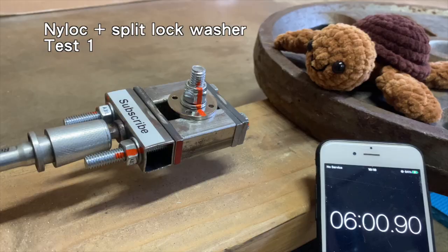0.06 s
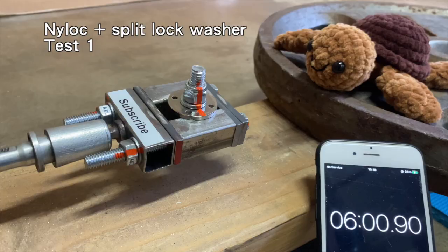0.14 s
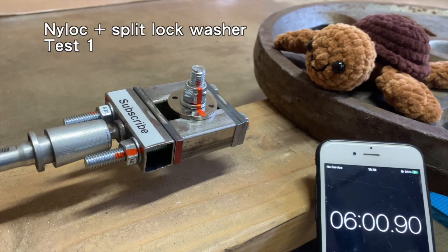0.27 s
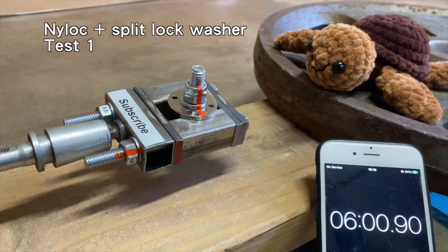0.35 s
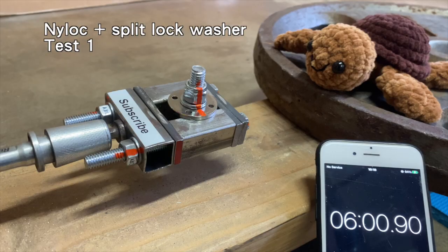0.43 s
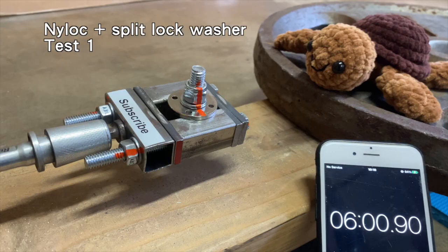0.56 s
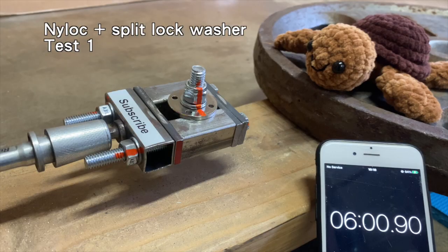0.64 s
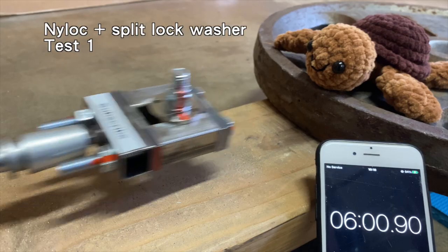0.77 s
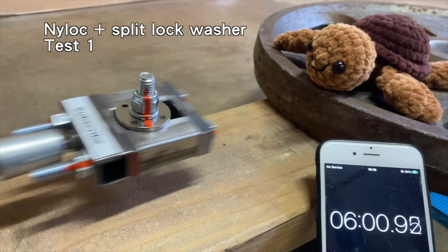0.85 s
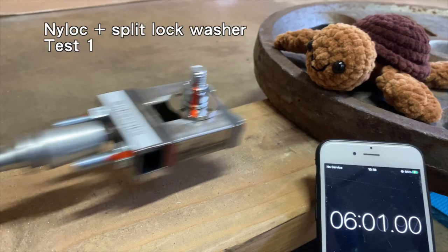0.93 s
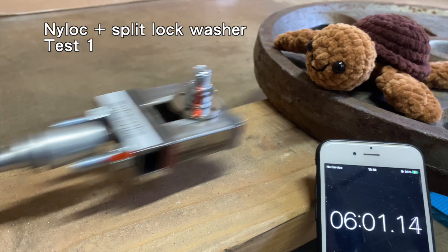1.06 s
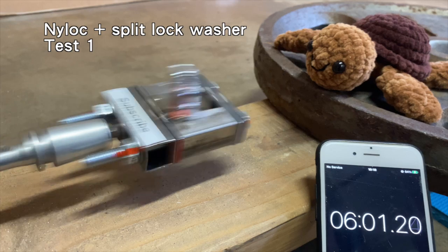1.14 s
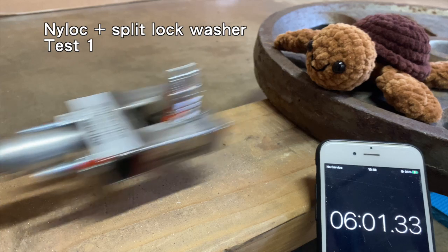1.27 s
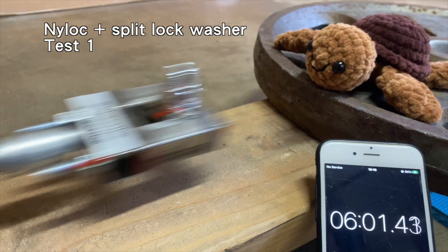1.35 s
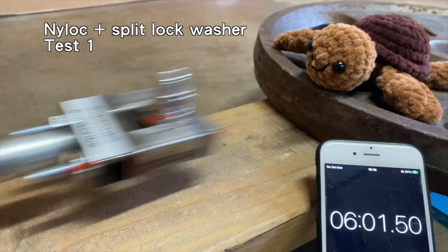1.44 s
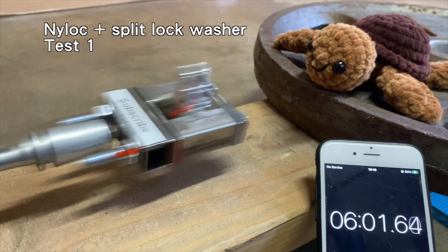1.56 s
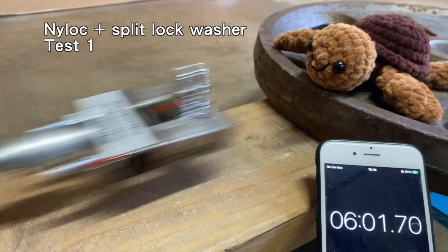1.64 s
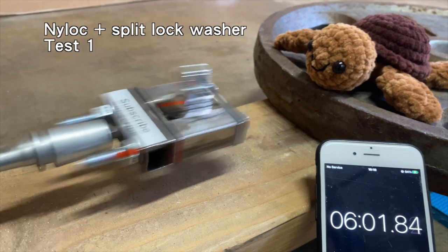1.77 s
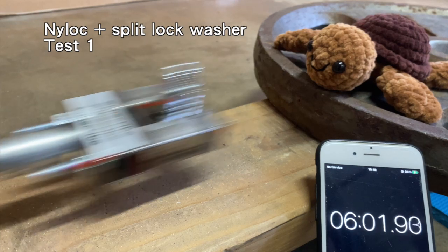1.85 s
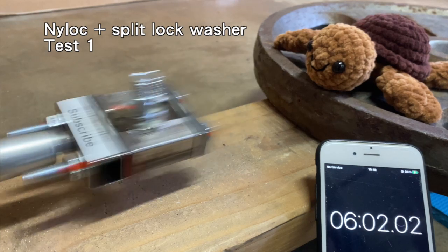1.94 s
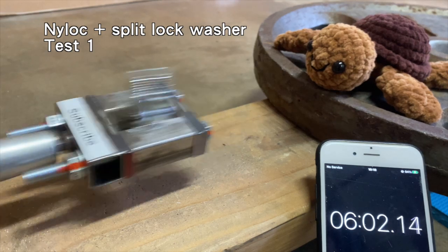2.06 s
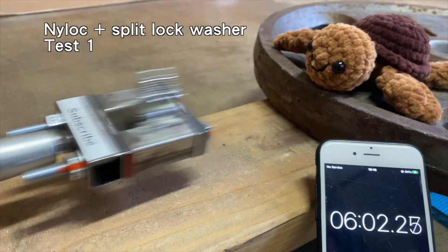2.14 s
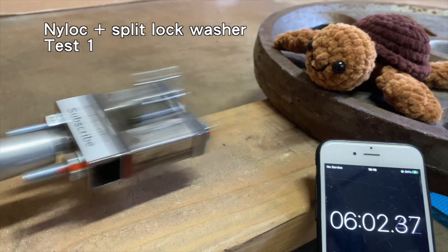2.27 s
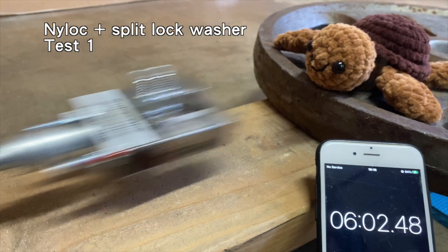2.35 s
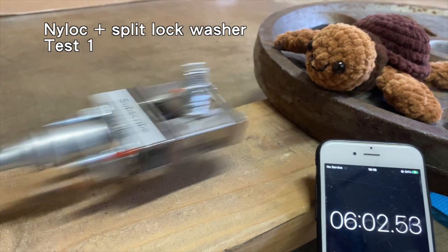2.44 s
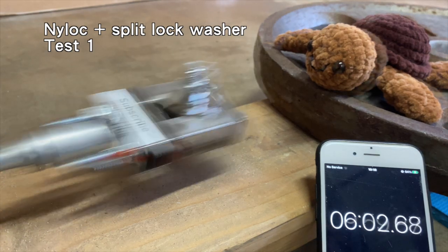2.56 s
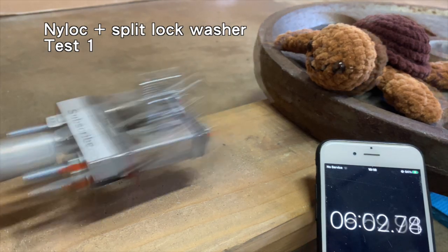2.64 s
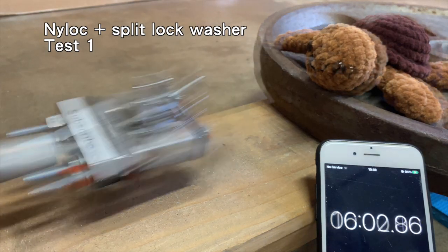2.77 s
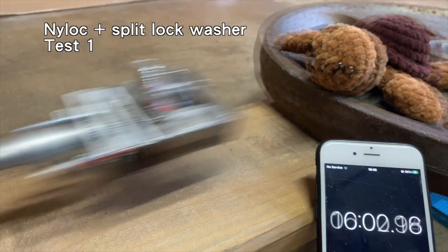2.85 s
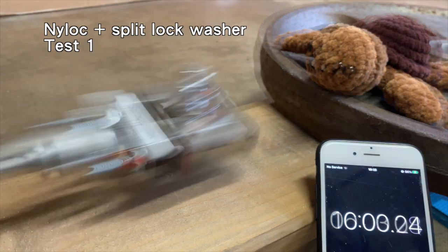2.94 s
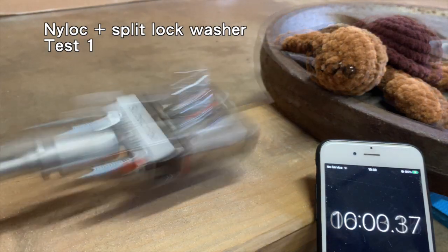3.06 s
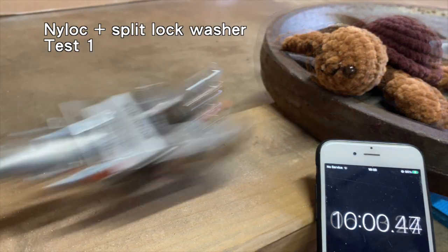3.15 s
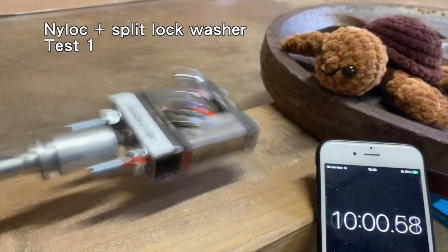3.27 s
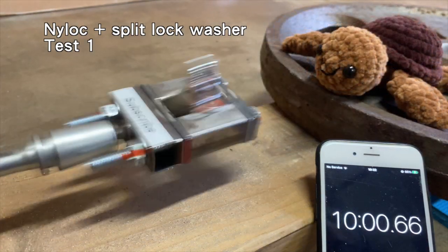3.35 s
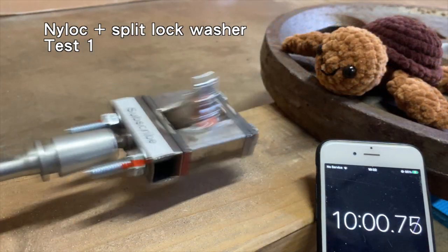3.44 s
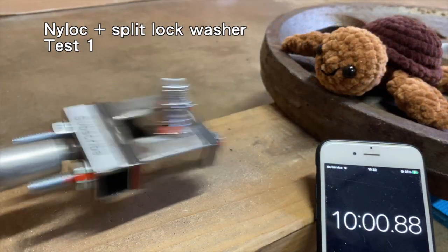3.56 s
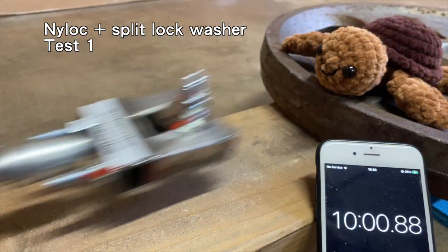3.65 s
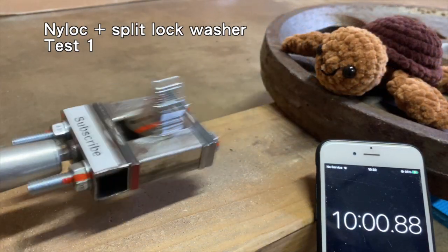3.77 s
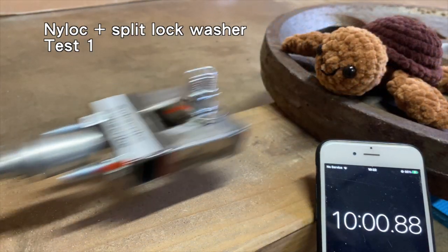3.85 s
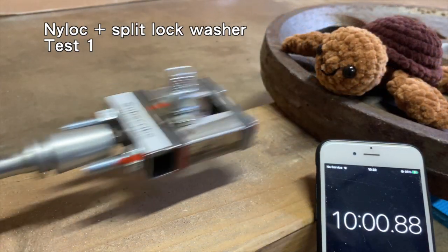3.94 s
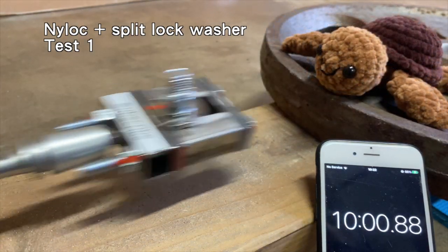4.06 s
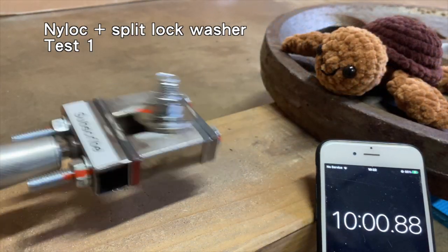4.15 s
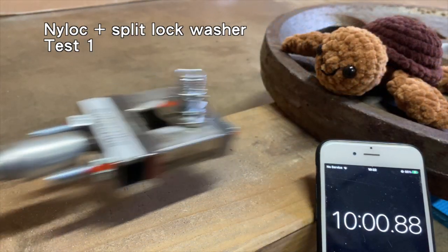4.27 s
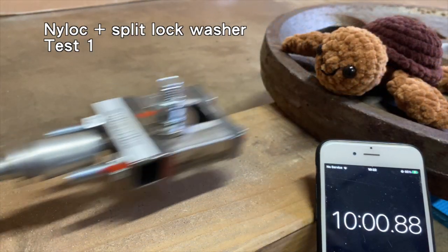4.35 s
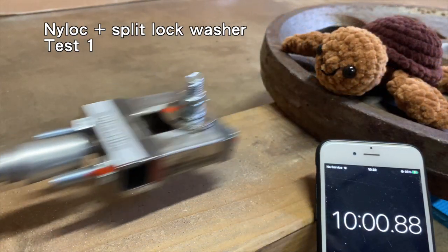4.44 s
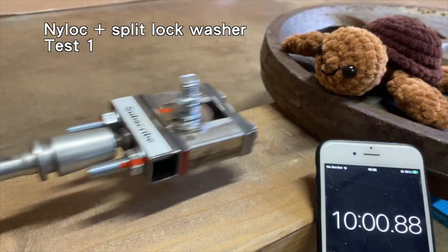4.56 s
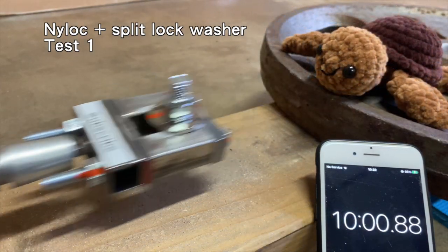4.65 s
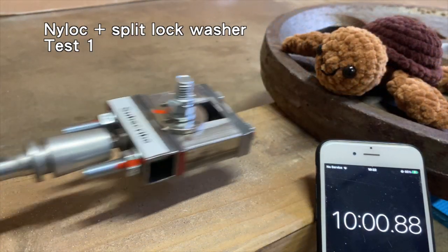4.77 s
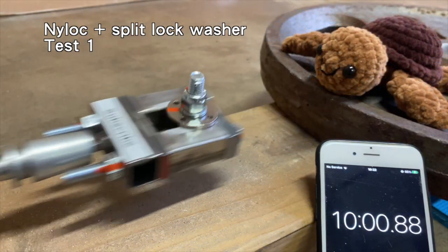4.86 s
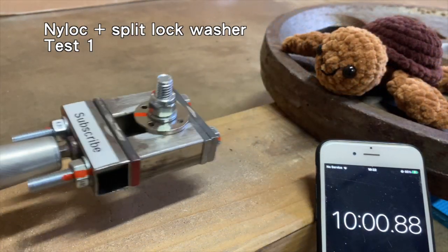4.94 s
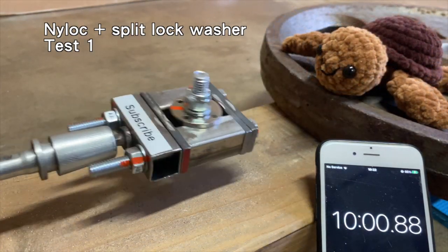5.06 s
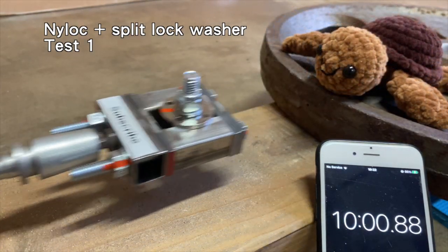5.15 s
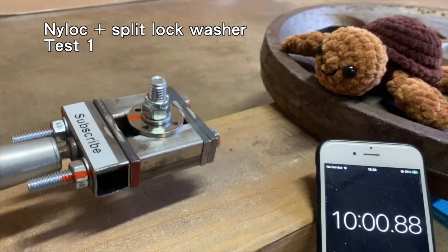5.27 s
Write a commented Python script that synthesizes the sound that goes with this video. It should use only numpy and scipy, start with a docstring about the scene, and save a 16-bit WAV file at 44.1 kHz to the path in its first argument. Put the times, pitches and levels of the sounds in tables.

```python
"""Reciprocating saw shaking a steel jig

A reciprocating saw starts, shakes a steel jig on a wooden bench and coasts to a stop, over shop rumble and hum.
A loose slide hits the jig frame at each end of the stroke: clicks ring tuned modes under bursts of noise.
Gears grind and loose parts chatter as random ticks through the same modes; bench jolts are falling sines.
A phone hears it through two microphone ports, with different delays and levels and a short room echo."""
import sys
import numpy as np
from scipy import signal
from scipy.fft import rfft, irfft, next_fast_len
from scipy.io import wavfile
from scipy.ndimage import uniform_filter1d

SR = 44100
rng = np.random.default_rng(int(sys.argv[2]) if len(sys.argv) > 2 else 0)


def unload_wav(signal):
    """Save mono or channel-first audio to the path in sys.argv[1] as 16-bit WAV at rate SR, clipped to [-1, 1]."""
    wavfile.write(
        sys.argv[1],
        SR,
        np.round(np.clip(np.atleast_2d(signal).T, -1, 1) * 32767).astype(np.int16),
    )


def how_loud(loudness_db):
    """Turn decibels into a plain amplitude multiplier (0 dB gives 1, 20 dB gives 10)."""
    steps = np.asarray(loudness_db, float) / 20
    return 10 ** steps


N = 233849


def evened(x):
    """Scales to rms 1."""
    return x / np.sqrt(np.mean(x ** 2) + 1e-20)


def read(points, hz):
    """Reads a spectrum on a log-frequency axis."""
    f, value = np.transpose(points)
    return np.interp(np.log(hz + 1), np.log(f + 1), value)


def curve(rows, column):
    """One column of a time table at every sample: -140 before the first row, held after the last."""
    rows = np.array(rows)
    return np.interp(np.arange(N) / SR, rows[:, 0], rows[:, column], -140, rows[-1, column])


def coloured(x, spectrum):
    """Filters by a dB spectrum."""
    size = next_fast_len(N)
    gain = how_loud(read(spectrum, np.fft.rfftfreq(size, 1 / SR)))
    return irfft(rfft(x, size) * gain, size)[..., :N]


def coloured_noise(spectrum):
    """White noise filtered by a dB spectrum."""
    return coloured(rng.standard_normal(N), spectrum)


def ring(clicks, hz, t60):
    """A mode: each click starts a dying sine."""
    radius = np.exp(-np.log(1000) / (t60 * SR))
    w = 2 * np.pi * hz / SR
    return signal.lfilter([0, np.sin(w)], [1, -2 * radius * np.cos(w), radius * radius], clicks)


def ticks(per_s, spread_db):
    """Random clicks of random sign, a few of them large."""
    out = (rng.random(N) < per_s / SR) * 1.
    at = np.flatnonzero(out)
    size, sign = rng.random((len(at), 2)).T
    out[at] = how_loud(-spread_db * np.log(size + .005)) * np.sign(sign - .5)
    return out


# low rumble of the shop and drone of the bench: (t/s, rumble level/dB, drone level/dB)
RUMBLE_LEVELS = [(0, -68, -72.5), (.6, -68, -74.5), (.64, -66, -59), (.675, -65, -61), (.8, -73, -68.5),
                 (.85, -67, -60.5), (1.1, -73.5, -66), (1.7, -69.5, -67), (2, -71, -64), (2.1, -82, -66.5),
                 (2.85, -88, -75), (3.05, -91, -72.5), (3.7, -103, -85), (4.3, -106, -81.5),
                 (5.3, -91.5, -92)]
# colour of the rumble: (f/Hz, level/dB)
RUMBLE_TONE = [(20, -31.5), (40, 14.5), (70, 13.5), (110, 18.5), (200, -71.5)]
# colour of the bench drone: (f/Hz, level/dB)
DRONE_TONE = [(60, -39.5), (130, 6), (220, 8), (320, -0.5), (500, -10), (900, -31.5)]


def rumble_and_drone():
    """Two bands of low noise: the shop's rumble and the bench's drone."""
    rumble = how_loud(curve(RUMBLE_LEVELS, 1)) * evened(coloured_noise(RUMBLE_TONE))
    drone = how_loud(curve(RUMBLE_LEVELS, 2)) * evened(coloured_noise(DRONE_TONE))
    return rumble + drone


# colour of the quiet shop air: (f/Hz, level/dB)
AIR_TONE = [(300, -22), (620, 11.5), (1500, 1), (2000, -3.5), (2400, -5.5), (2770, -10), (3100, -0.5),
            (3500, -10), (4000, -19.5), (6000, -42)]
# loudness of the shop air: (t/s, level/dB)
AIR_LEVELS = [(0, -77), (.6, -79), (4.8, -85.5), (5.3, -92.5)]


def shop_air():
    """The quiet air of the room as soft midrange noise."""
    return how_loud(curve(AIR_LEVELS, 1)) * evened(coloured_noise(AIR_TONE))


# colour of the faint hiss: (f/Hz, level/dB)
HISS_TONE = [(1500, 0.5), (3000, -4), (5000, -4.5), (8000, -7.5), (12000, -11), (13500, -31), (14500, -50)]


def hiss():
    """Faint treble noise: it drops early to a fainter floor, puffs once and fades, and ends at 0.62 s."""
    puff_s, rise_s, fall_db_per_s = 0.19, 0.027, 118
    t = np.arange(N) / SR
    rise = np.clip((t - puff_s) / rise_s, 0, 1)
    puff = rise * how_loud(-74 - fall_db_per_s * np.maximum(t - puff_s - rise_s, 0))
    opening = how_loud(-85) * (t < 0.06)
    floor = how_loud(-95) * (t < 0.62)
    return (opening + puff + floor) * evened(coloured_noise(HISS_TONE))


def whistle():
    """A faint fuzzy tone, noise through one narrow mode, that fades at the start."""
    hz, level_db, end_s = 1860, -77, 0.13
    fade = np.clip(1 - np.arange(N) / SR / end_s, 0, 1)
    return how_loud(level_db) * fade * evened(ring(rng.standard_normal(N), hz, 0.02))


# mains hum, louder while the motor strains to start: (t/s, fundamental level/dB, octave level/dB)
HUM_LEVELS = [(0, -84, -102), (.1, -66, -91), (.18, -63.5, -74), (.26, -67, -101), (.3, -63, -104),
              (.4, -72, -94), (.62, -67.5, -85), (.64, -54, -63.5), (.67, -62.5, -72), (.71, -58.5, -58.5),
              (.75, -58, -64), (.8, -58.5, -68.5), (.85, -62, -91.5), (1.06, -66.5, -75.5),
              (1.1, -66, -101)]


def hum():
    """About twice the mains frequency and its harmonics, over a faint far hum of noise through a narrow mode."""
    near_hz, third_db = 122.4, -6  # third harmonic against the octave
    far_hz, far_db = 120, -91
    turn = 2 * np.pi * near_hz * np.arange(N) / SR
    sounding = np.arange(N) / SR < HUM_LEVELS[-1][0]
    upper = np.sin(2 * turn) + how_loud(third_db) * np.sin(3 * turn)
    near = how_loud(curve(HUM_LEVELS, 1)) * np.sin(turn) + how_loud(curve(HUM_LEVELS, 2)) * upper
    far = evened(ring(rng.standard_normal(N), far_hz, 0.23))
    return np.sqrt(2) * near * sounding + how_loud(far_db) * far


# the slide strikes the frame at each end of its stroke: (t/s, housing level/dB,
# then steel level/dB under 5.6 kHz, 5.6-7 kHz, 7-9 kHz and above 9 kHz), before each strike's own variation
BLOWS = [(0.8640, -27, -21.5, -24, -33.5, -24.5), (0.9332, -32, -24.5, -20, -21.5, -31.5),
         (0.9997, -27.5, -24, -26, -27, -26.5), (1.0523, -32.5, -24.5, -26, -30, -32),
         (1.1054, -28.5, -24.5, -20, -27.5, -24.5), (1.1537, -54, -26.5, -23, -30, -28),
         (1.2022, -32.5, -28.5, -20, -34, -25.5), (1.2433, -37.5, -32, -30, -37, -32),
         (1.2892, -31, -35.5, -32, -37, -26), (1.3269, -28, -24, -25.5, -25, -30.5),
         (1.367, -34.5, -31.5, -26, -31.5, -28.5), (1.405, -60, -38, -40, -31.5, -34.5),
         (1.4436, -32, -34, -29.5, -31, -27.5), (1.4843, -38, -32, -34, -42.0, -38),
         (1.515, -33, -30.5, -28, -34.5, -25), (1.5531, -46, -37, -40, -29.5, -31.5),
         (1.5876, -34.5, -30.5, -26, -29.5, -27), (1.624, -40, -33, -31.5, -34, -34),
         (1.6596, -34.5, -32.5, -29, -34, -31.5), (1.6934, -35, -35, -38, -36.5, -32),
         (1.7235, -36, -36, -37.5, -29, -29.5), (1.7594, -42, -37.5, -38, -37, -33.0),
         (1.7917, -38, -33.5, -31, -30, -32.5), (1.8242, -42, -34, -54, -30.5, -32),
         (1.856, -37.5, -36, -34, -31, -29), (1.8919, -44, -35, -35, -40, -36),
         (1.9236, -35.5, -38, -29, -30, -30.5), (1.956, -41, -30.5, -28.5, -38, -34),
         (1.991, -39.0, -37, -28, -36, -34), (2.0185, -41.5, -37, -40, -42, -32.5),
         (2.0519, -35, -37, -32, -38, -37.5), (2.0831, -42, -34, -38, -42, -35.5),
         (2.1139, -32, -33, -33, -34, -28.5), (2.147, -60, -36, -40, -47, -39),
         (2.1776, -36.5, -34.5, -28.5, -32, -29), (2.2099, -39.5, -33, -31, -43, -35.5),
         (2.2392, -36, -38.5, -29.5, -41, -33.5), (2.271, -36.5, -31.5, -31, -40, -30.5),
         (2.3005, -36.5, -34, -25.5, -38.5, -30), (2.334, -46, -31, -33, -48, -38),
         (2.3659, -33.5, -31, -31, -45, -33), (2.394, -36, -39, -32.5, -46, -32),
         (2.425, -33.5, -34, -38, -34.5, -24.5), (2.4581, -39, -39, -37, -45, -37),
         (2.4883, -34.5, -34.5, -33, -33, -28), (2.519, -46, -38, -36, -53, -38.0),
         (2.547, -32, -38.5, -28.5, -43, -27.5), (2.58, -60, -38, -43, -50, -40),
         (2.6097, -40, -39, -31, -36, -35), (2.6415, -35.5, -34, -38, -38, -38),
         (2.6736, -37, -38.5, -33, -44, -30), (2.703, -57, -47, -35, -45, -44),
         (2.7336, -39.5, -42, -36.5, -39, -33), (2.7636, -41, -51, -35, -43, -38.5),
         (2.794, -42, -48, -33, -45, -26.5), (2.827, -51, -53, -35, -49, -37.5),
         (2.8552, -43, -55, -56, -55, -34), (2.886, -57, -58, -61, -59, -43),
         (2.918, -43.5, -48, -35, -45, -30.5), (2.9641, -43, -39, -39, -47.5, -38),
         (2.9983, -49, -44.0, -41, -42.5, -39), (3.0314, -66, -43.5, -46, -36, -40),
         (3.0595, -39.5, -40, -37, -38, -32.5), (3.0923, -50, -36, -43, -39, -39),
         (3.123, -58, -40, -45.0, -52, -32.5), (3.1557, -40, -44, -46, -41.0, -37),
         (3.186, -38, -37.5, -30.5, -34, -34.5), (3.225, -41, -43, -37, -44, -37.5),
         (3.2614, -41.5, -38, -41, -38, -35.5), (3.3008, -43.5, -59, -53, -46, -42),
         (3.336, -45, -43, -39, -43, -33), (3.3748, -42, -40, -42, -43, -35.5),
         (3.4151, -40, -42, -33, -46.5, -35.5), (3.459, -48, -43, -42, -49, -43),
         (3.4995, -38.5, -40, -33, -41, -34), (3.5453, -52.5, -48, -45.5, -42, -44.5),
         (3.5944, -49, -41, -36, -41, -40.5), (3.6404, -54, -41, -41, -40, -41),
         (3.6952, -42, -40, -32, -36.5, -36.5), (3.7429, -43.5, -43, -41, -40, -36.5),
         (3.8, -43.5, -41.5, -40.5, -42, -41.5), (3.856, -47.5, -44, -40.5, -43.5, -45),
         (3.917, -42.5, -42.5, -43, -42, -41), (3.972, -44, -45, -50, -40.5, -45),
         (4.043, -42.5, -46, -38, -37, -40.5), (4.1042, -41, -43, -42, -40.5, -43),
         (4.1813, -42.5, -40, -36.5, -35, -41), (4.2648, -52, -50, -46, -44, -46),
         (4.3293, -43.5, -41.5, -42, -36, -41), (4.4185, -50.0, -43, -46, -46, -45.5),
         (4.5221, -50, -47, -40, -35.5, -44.5), (4.618, -63, -48, -49.5, -47.5, -58),
         (4.734, -55, -54, -48.5, -38.5, -48.5), (4.8615, -65, -55, -61, -58.5, -62.5)]
# play in the crank knocks the housing as it takes up and lets go:
# (t/s, housing level/dB under 2 kHz, housing level/dB over 2 kHz, steel level/dB, change/dB at each rebound)
KNOCKS = [(0.619, -54, -62, -54, -1.5), (0.622, -41, -43.5, -49, -14), (0.6347, -34.5, -45, -53.5, -4),
          (0.6467, -43, -52, -57, -10), (0.6553, -39.5, -52, -53, -3.5), (0.695, -34, -39, -55, -2.5),
          (0.708, -41, -54, -52.5, -2), (0.728, -36, -47, -57, -13), (0.77, -41, -58, -67, -1),
          (0.81, -38, -44, -55, 0), (0.823, -40, -45, -58, -10), (0.8289, -29, -38, -52, -8),
          (0.8377, -29.5, -41, -49, -14), (0.893, -31, -42, -62, -6), (0.9638, -32, -40, -62, -21),
          (1.047, -32, -47, -64, -5), (1.0782, -36, -39, -62, -14), (1.129, -49, -50, -68, -14),
          (1.18, -48, -36, -62, -10), (1.638, -35, -41, -62, -7), (3.667, -52, -59, -70, -8),
          (3.717, -47, -46, -67, -8), (3.769, -56, -49, -59, -2.5), (3.943, -47, -60, -73, -14),
          (4.005, -50, -60, -64, -7), (4.0268, -54, -64, -78, -8), (4.064, -52, -62, -56, -9),
          (4.162, -55, -55, -70, -1), (4.17, -59, -44, -60, -15), (4.236, -54, -56, -75, -2),
          (4.283, -60, -58, -72, -12), (4.2905, -50, -57, -63, -0.5), (4.3178, -56, -50, -80, -8),
          (4.393, -53, -61, -84, -8), (4.431, -70, -65, -57, -1), (4.4884, -50, -69, -74, -2),
          (4.531, -56, -51, -77, -15), (4.538, -65, -57, -77, -14), (4.548, -63, -69, -75, -20),
          (4.585, -57, -65, -78, -2), (4.646, -67, -64, -65, -12), (4.663, -54, -59, -76, -7),
          (4.69, -54, -76, -75, -1), (4.808, -45, -50, -64, -14), (4.917, -66, -72, -78, -3),
          (4.934, -50.5, -57, -66, -10), (5.0638, -63, -68.5, -77, -8), (5.067, -54, -64, -71.5, -2),
          (5.0736, -59, -67, -78, -13), (5.0892, -47.5, -53.5, -67, -4.5), (5.282, -50.5, -53.5, -67, -29)]
# a blow is four contacts in quick succession: level/dB of each in the steel
STEEL_CONTACTS = [-3.5, -2, -8, -15]
# level/dB of each contact in the housing, which takes the force later
HOUSING_CONTACTS = [-11, -4.5, -7.5, -11.5]


def strikes():
    """Blows, then knocks: times in s, dB reaching six frequency groups, dB of contacts in housing and steel."""
    knock_s, low_db, high_db, steel_db, rebound_db = np.transpose(KNOCKS)
    blow_s, *blows_db = np.transpose(BLOWS)
    # a knock jars the low rings of the steel most
    knocks_db = [low_db, high_db, steel_db + 7, steel_db + 4, steel_db, steel_db]
    reach_db = np.c_[blows_db[:1] + blows_db, knocks_db]
    contacts_db = [np.r_[np.tile(db, (len(blow_s), 1)), rebound_db[:, None] * np.arange(4)]
                   for db in (HOUSING_CONTACTS, STEEL_CONTACTS)]
    return np.r_[blow_s, knock_s], reach_db, contacts_db


GROUP_EDGES = [2000, 3200, 5600, 7000, 9000]  # Hz that part the six groups: two of housing, four of steel
# modes of the steel jig: (f/Hz, level/dB, t60/s)
JIG = [(3635, -6, .038), (3765, -6.5, .033), (4005, -7.5, .036), (4350, -10, .028), (4815, -5, .03),
       (5230, -14, .025), (5560, -15, .02), (6140, -5, .036), (6260, -9, .025), (6570, -8, .032),
       (7480, -2, .025), (7560, -6, .05), (8480, -8, .05), (9860, -6, .055), (10690, -9, .04),
       (10870, -1.5, .055), (11480, -8, .045), (12000, -8, .025), (12400, -7, .025), (13600, -14, .025),
       (14750, -11, .03), (15500, -12, .025)]
# resonances of the saw housing: (f/Hz, level/dB, t60/s as struck by the slide)
HOUSING = [(632, -10.5, 0.057), (839, -8, 0.018), (1060, -16, 0.014), (1168, -7.5, 0.013),
           (1264, -8.5, 0.013), (1410, -2.5, 0.0047), (1658, 3.5, 0.013), (1880, -5, 0.0055),
           (2180, -6, 0.014), (2380, -6.5, 0.0042), (2554, -4.5, 0.017), (2656, -3, 0.024),
           (2804, -2.5, 0.015)]


def struck_modes(at, reach_db, contacts_db, knock):
    """Each contact rings jig and housing; no two strikes land on the same spot, so mode levels vary."""
    ring_db, spread_db = -11.0, 3.5
    jig_detune, housing_detune = .006, .012  # share of the mode's frequency
    knock_damped = 0.51  # the crank stays pressed on the housing: shorter rings
    seat = np.digitize(rng.standard_normal(len(at)), [-.43, .43]) - 1  # how the slide sits shifts the tuning
    push = np.sign(rng.standard_normal(at.shape))  # the housing is pushed as one piece
    out = np.zeros(N)
    for k, (hz, db, t60) in enumerate(JIG + HOUSING):
        in_jig = k < len(JIG)
        spot = rng.standard_normal(at.shape)
        level_db = reach_db[np.digitize(hz, GROUP_EDGES), :, None] + contacts_db[in_jig] + db + ring_db
        size = how_loud(level_db + spread_db * spot / (1 + knock[:, None]))
        size = size * (np.sign(spot) if in_jig else push)
        held = knock & (not in_jig)
        clicks = np.zeros(N)
        np.add.at(clicks, at[held], size[held])
        out += ring(clicks, hz, knock_damped * t60)
        detune = jig_detune if in_jig else housing_detune
        for way in (-1, 0, 1):
            clicks = np.zeros(N)
            free = (seat == way) & ~held
            np.add.at(clicks, at[free], size[free])
            out += ring(clicks, hz * (1 + detune * way * (-1) ** k), t60)
    return out


# broad crack of steel on steel: (f/Hz, level/dB)
CRACK = [(300, -63), (1000, 0.5), (2500, -3.5), (5500, -11), (7500, 1), (9000, -1.5), (12200, 3),
         (14000, -4.5), (15600, -5), (16000, -34), (17000, -44)]


def crack_and_cloud(at, reach_db, contacts_db, knock):
    """Noise bursts: the crack of contact, then a cloud of modes too dense to tell apart, group by group."""
    crack_db, crack_s = 0, 0.00066
    cloud_db, cloud_s = -9, 0.0024
    knock_cloud_db = -7.5  # the pressed crank leaves less cloud
    size = next_fast_len(N)
    steel = rfft(coloured_noise(CRACK), size)
    group = np.digitize(np.fft.rfftfreq(size, 1 / SR), GROUP_EDGES)
    out = np.zeros(N)
    for g, level_db in enumerate(reach_db):
        cracks, clouds = np.zeros((2, N))
        force = how_loud(level_db[:, None] + contacts_db[g > 1])
        np.add.at(cracks, at, force)
        np.add.at(clouds, at, force * how_loud(knock_cloud_db * knock)[:, None])
        shape = sum(how_loud(db) * signal.lfilter([1], [1, -np.exp(-1 / (fade_s * SR))], clicks)
                    for db, fade_s, clicks in ((crack_db, crack_s, cracks), (cloud_db, cloud_s, clouds)))
        # the contact takes just over a millisecond to close
        shape = uniform_filter1d(shape, size=53, origin=26)
        out += shape * irfft(steel * (group == g), size)[:N]
    return out


# sharp contacts wake little of the housing's low end: (f/Hz, level/dB)
BLOW_TONE = [(500, -8.5), (1200, 0.5), (1800, 2.5), (2400, 4.5), (3300, -0.5)]


def blows_and_knocks():
    """Slide blows and crank knocks, each with quick bounces, ring the modes and crack as noise."""
    bounce_s, soft_db, coast_s = .0022, 3, 3.4
    s, reach_db, contacts_db = strikes()
    count = len(s)
    knock = np.arange(count) >= len(BLOWS)
    # until the saw coasts, blows land softer by chance and bite at a later contact
    softness = soft_db * abs(rng.standard_normal(count)) * ~knock * (s < coast_s)
    contacts_db = [db + np.outer(softness, [-1, -.5, .5, .5]) for db in contacts_db]
    after = np.cumsum(bounce_s * abs(rng.standard_normal((count, 3))), axis=1)
    at = np.minimum(np.round(SR * (s[:, None] + np.c_[0 * s, after])).astype(int), N - 1)
    # what a blow gives the housing under 2 kHz varies: -1 dB, spread 3 dB
    reach_db[0, :len(BLOWS)] += -1 + 3 * rng.standard_normal(len(BLOWS))
    rung = struck_modes(at, reach_db, contacts_db, knock)
    return coloured(rung + crack_and_cloud(at, reach_db, contacts_db, knock), BLOW_TONE)


# between blows: (t/s, gear grind level/dB, chatter of loose parts level/dB)
RUNNING = [(.62, -101, -102), (.68, -59.5, -100), (.79, -60, -68.5), (.82, -48, -64), (.88, -50, -60),
           (1.2, -51.5, -59.5), (1.7, -52, -51.5), (2.4, -54, -54.5), (3.03, -56, -54.5),
           (3.47, -59.5, -62), (3.74, -63.5, -70), (4.23, -71, -74.5), (4.52, -72, -76), (4.62, -85, -82),
           (4.7, -72.5, -82), (4.775, -72.5, -73), (4.8, -82, -82), (4.9, -88, -94), (4.93, -74, -86),
           (5.02, -75.5, -92.5), (5.055, -97, -100), (5.1, -79, -100), (5.17, -87.5, -104)]
# clacks against the grind, plainer as the saw slows: (t/s, level/dB)
CLACKS = [(.62, -6), (1.3, -5), (2, -6.5), (3.4, 1.5), (3.9, 2), (5.2, -3.5)]


def gears():
    """Gear teeth tick and rub inside the housing; the play in the crank clacks, short and dry."""
    teeth_per_s, clacks_per_s, wash_db, damped = 1500, 110, -1, 0.41
    clacks = ticks(clacks_per_s, 3)
    rung = sum(how_loud(db) * evened(ring(ticks(teeth_per_s, 3.2), hz, t60)) for hz, db, t60 in HOUSING)
    clatter = sum(how_loud(db) * evened(ring(clacks * rng.standard_normal(N), hz, damped * t60))
                  for hz, db, t60 in HOUSING)
    rub = coloured_noise(CRACK[:4] + [(8000, -43.5)])
    grind = evened(evened(rung) + how_loud(wash_db) * evened(rub))
    share = how_loud(curve(CLACKS, 1))
    mix = (grind + share * evened(coloured(clatter, BLOW_TONE))) / np.sqrt(1 + share ** 2)
    return how_loud(curve(RUNNING, 1)) * mix


def chatter():
    """Nut, washers and slide jitter against the frame between blows; the rubbing damps the ring."""
    ticks_per_s, taps_per_s, fizz_per_s = 500, 90, 3200
    tap_db, fizz_db, damped = -2, 2, 0.18
    taps = how_loud(tap_db) * evened(ticks(taps_per_s, 0.77))
    rung = np.zeros(N)
    for hz, db, t60 in JIG:
        hits = evened(ticks(ticks_per_s, 7.0)) + taps * rng.standard_normal(N)
        rung += how_loud(db) * evened(ring(hits, hz, damped * t60))
    fizz = coloured(evened(ticks(fizz_per_s, 0.86)) + taps, [(2500, -21)] + CRACK[3:])
    return how_loud(curve(RUNNING, 2)) * evened(evened(rung) + how_loud(fizz_db) * evened(fizz))


# jolts through the bench: (t/s, level/dB before shaping, length/s, pitch fall f/Hz)
JOLTS = [(1.372, -46, 0.01, 308), (1.659, -51, 0.014, 500), (1.728, -32, 0.045, 710),
         (1.827, -50, 0.037, 700), (1.858, -41.5, 0.037, 920), (1.919, -77, 0.055, 610),
         (2.43, -52, 0.0099, 580), (2.641, -42.5, 0.013, 930), (2.666, -53.5, 0.027, 400),
         (2.766, -43.5, 0.014, 910), (2.797, -49, 0.025, 720), (2.841, -49, 0.01, 500),
         (2.98, -50, 0.0059, 405)]


def jolts():
    """Bending waves in the bench: the treble arrives first, so each thump falls in pitch."""
    low_hz, sweep_s, rise_s = 92, .0031, .003
    out = np.zeros(N)
    for s, db, length, sweep_hz in JOLTS:
        t = np.arange(0, length, 1 / SR)
        pitch_hz = low_hz * (1 - 0.36 * t / length) + sweep_hz * np.exp(-t / sweep_s)
        turns = np.cumsum(pitch_hz) / SR
        ends = np.minimum(t / rise_s, 1) * np.minimum((length - t) / rise_s, 1)
        shape = ends * np.exp(-1.1 * t / length)
        out[round(s * SR):][:len(t)] += how_loud(db) * shape * np.sin(2 * np.pi * turns)
    return out


# phase between the two ports: (f/Hz, phase/rad)
PORT_PHASE = [(0, 0), (690, 2), (1200, 3.6), (1720, 3.1), (2240, 5.7), (2760, 7.7), (3270, 7.3),
              (3790, 6.3), (6370, 6.8), (6890, 6.3), (7400, 5.9), (8960, 3.2), (10000, 1.7), (11025, .1),
              (11540, -.5), (13090, -3.1), (13600, -3.4), (14640, -5.6), (15160, -6.2), (16700, -6.4)]
# level difference between the two ports: (f/Hz, level/dB)
PORT_LEVEL = [(60, 0.0), (110, 0.0), (200, 1.0), (380, 3.5), (700, 6.0), (1290, 7.0), (2380, 5.0),
              (4400, 4.5), (8120, 0.5), (15000, 0.0)]
# share of direct sound against the room: (f/Hz, share of amplitude)
DIRECT = [(200, .99), (600, .8), (1700, .74), (3000, .72), (3800, .85), (5300, .68), (6800, .94),
          (16000, .94)]


def ports(x):
    """Each port hears the direct sound with its own phase and level, plus echoes that change as the jig moves."""
    room_t60 = .1  # s
    size = next_fast_len(N + SR // 2)
    hz = np.fft.rfftfreq(size, 1 / SR)
    t = np.arange(SR // 2) / SR
    tails = rng.standard_normal((4, 2, SR // 2)) * how_loud(-60 * t / room_t60) * (t > .002)
    wander = uniform_filter1d(rng.standard_normal((4, N)), size=SR // 20, axis=1)
    places = wander / np.linalg.norm(wander, axis=0)  # four echo patterns share the power
    places = uniform_filter1d(places, size=SR // 200, axis=1)
    echoes = sum(rfft(x * place, size) * rfft(tail, size) for place, tail in zip(places, tails))
    echoes = echoes / np.linalg.norm(tails[0, 0])
    direct = np.clip(read(DIRECT, hz), 0, 1)
    side = np.array([[.5], [-.5]])
    shift = np.exp(1j * side * np.interp(hz, *np.transpose(PORT_PHASE)))
    heard = direct * shift * rfft(x, size) + np.sqrt(1 - direct ** 2) * echoes
    return irfft(heard * how_loud(side * read(PORT_LEVEL, hz)), size)[:, :N]


def scene():
    """The steel sounds carry no deep bass; jolts come through the bench, nearly alike at both ports."""
    shop = rumble_and_drone() + shop_air() + hiss() + whistle()
    steel = coloured(blows_and_knocks() + gears() + chatter(), [(100, -27.5), (350, 1)])
    return ports(steel + hum() + shop) + jolts() * how_loud(np.array([[.7], [-.7]]))


def top_cut(x):
    """Nothing passes above the cut-off."""
    return signal.sosfilt(signal.butter(12, 17130, fs=SR, output="sos"), x)


# treble edge of the phone: (f/Hz, level/dB)
PHONE_TONE = [(15700, 0.5), (16100, -8), (16600, -23.5), (16900, -66)]


def record(dry):
    """The phone cuts off the highest treble."""
    mix = coloured(dry, PHONE_TONE)
    return top_cut(mix)


dry = scene()
out = record(dry)
unload_wav(out)
```